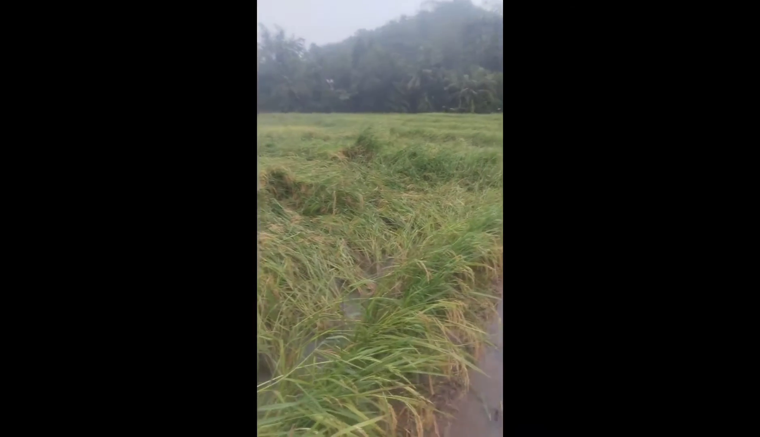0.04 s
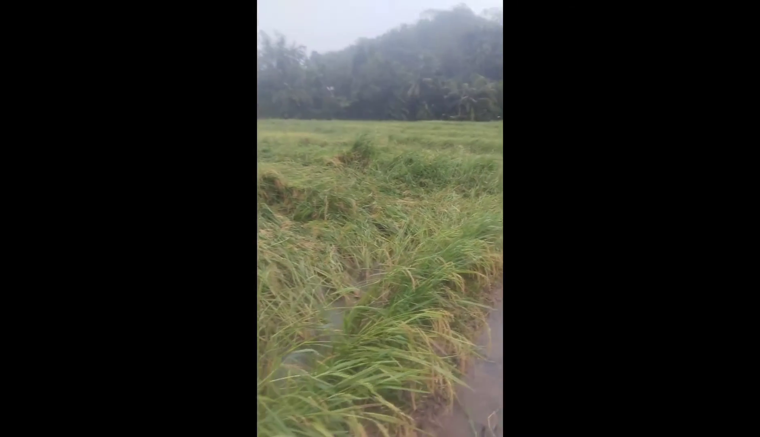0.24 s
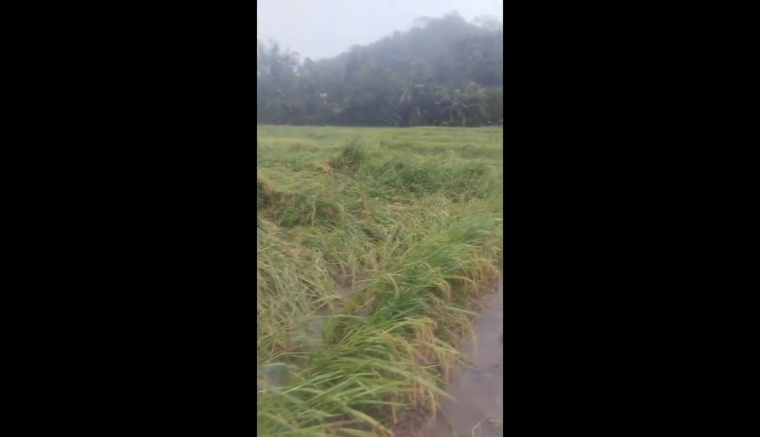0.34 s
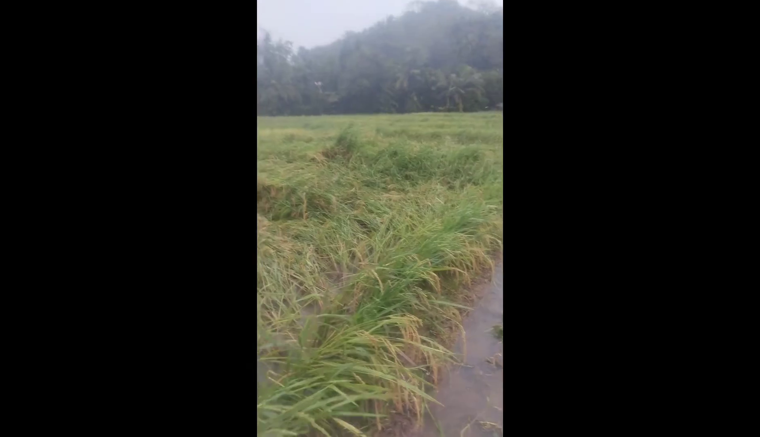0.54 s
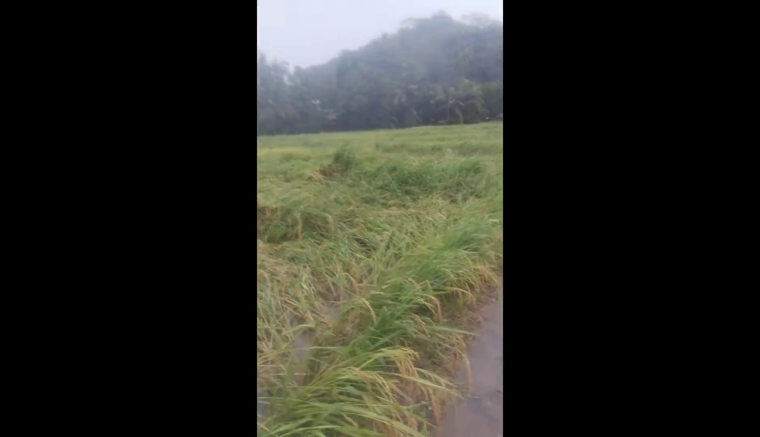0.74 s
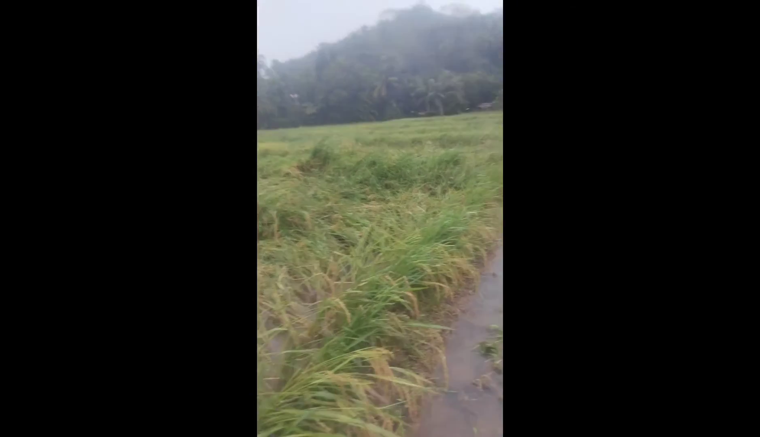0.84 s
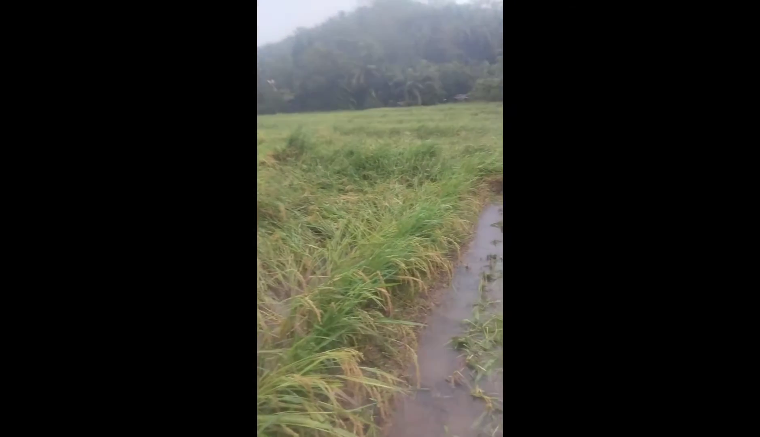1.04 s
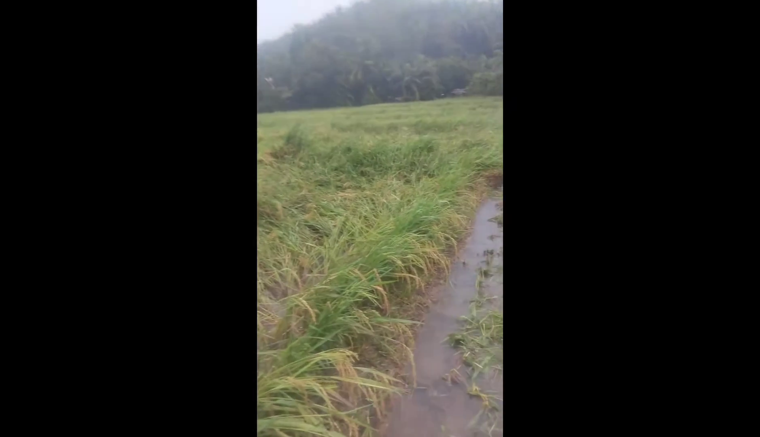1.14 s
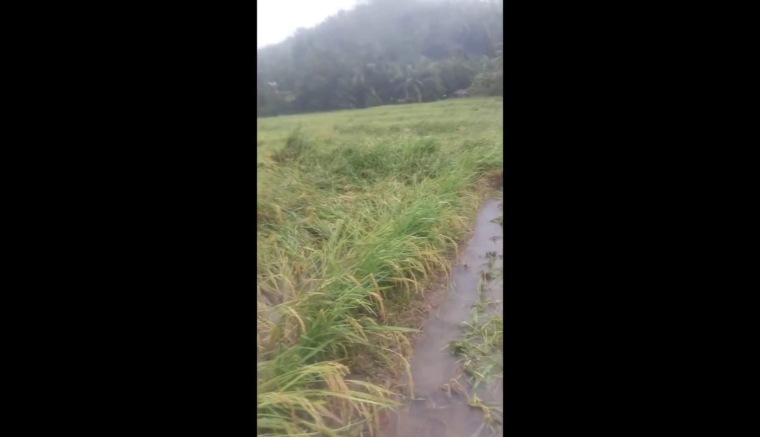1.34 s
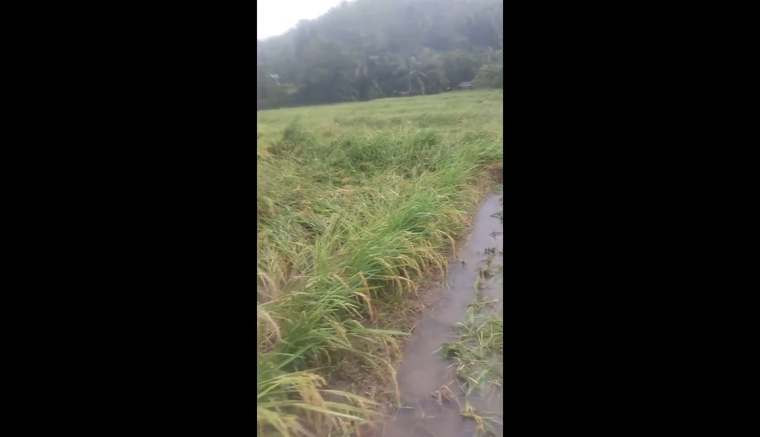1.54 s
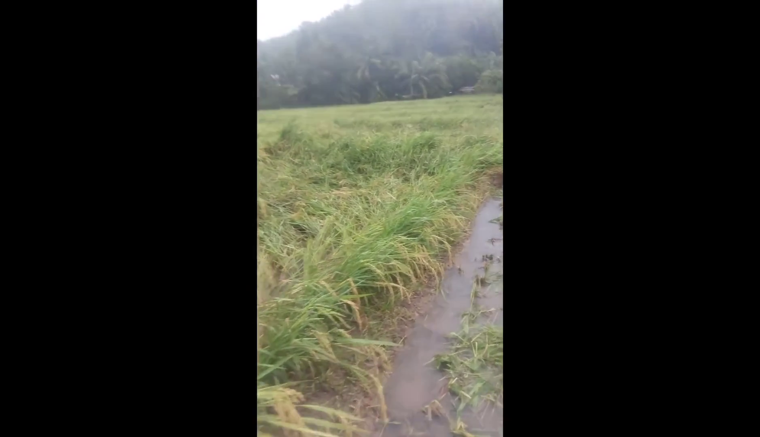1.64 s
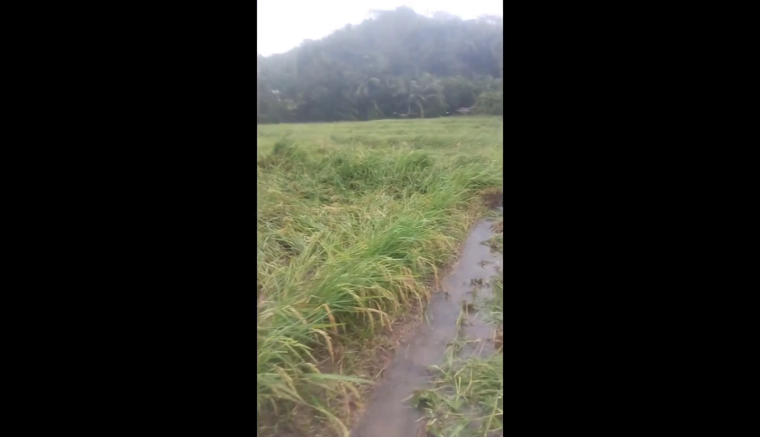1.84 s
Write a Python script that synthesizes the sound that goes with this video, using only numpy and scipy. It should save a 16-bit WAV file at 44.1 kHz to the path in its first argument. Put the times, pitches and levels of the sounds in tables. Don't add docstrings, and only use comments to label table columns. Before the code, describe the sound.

Wading footsteps in a flooded rice field. A dull heel thud at 0.2 seconds leads to a loud, sharp mud splat at 0.35, then bubbling slosh and spray fading with droplet ticks until 0.9. A softer thud and plop come at 1.2, small squelches at 1.5. A far bird whistles at 0.9, 1.45 and 1.8 over faint insects, light wind and a soft croak near 1.55.

```python
import sys
import numpy as np
from scipy import signal
from scipy.fft import rfft, irfft
from scipy.io import wavfile
from scipy.ndimage import uniform_filter1d, map_coordinates

SR = 44100
rng = np.random.default_rng(int(sys.argv[2]) if len(sys.argv) > 2 else 0)


def put_to_file(sound):
    columns = np.atleast_2d(sound).T
    safe = np.clip(columns, -1, 1)
    whole_steps = np.round(safe * 32767)
    wavfile.write(sys.argv[1], SR, whole_steps.astype(np.int16))


def to_linear_factor(level_db):
    exponent = np.asarray(level_db, float) / 20
    return 10 ** exponent


N = 83790


def unit(x):
    return x / np.sqrt(np.mean(x ** 2) + 1e-20)


def along(points, hz):
    f, db = np.transpose(points)
    return to_linear_factor(np.interp(np.log(hz + 1), np.log(f + 1), db))


def level(rows):
    return np.interp(np.arange(N) / SR, *np.transpose(rows))


def wobble(rate_hz):
    knots = rng.standard_normal(int(N * rate_hz / SR) + 4)
    return map_coordinates(knots, [np.arange(N) * rate_hz / SR])


def noise(gain, patchy_db):
    z = signal.stft(rng.standard_normal(N + 512), nperseg=512)[2]
    patches = uniform_filter1d(rng.standard_normal(z.shape), size=5, axis=0)
    patches = uniform_filter1d(patches, size=10, axis=1)
    x = signal.istft(z * to_linear_factor(patchy_db * unit(patches)), nperseg=512)[1][:N]
    return unit(irfft(rfft(x) * gain(np.fft.rfftfreq(N, 1 / SR)), N))


def band(hz, wide_hz):
    return lambda f: 1 / (1 + ((f - hz) / wide_hz) ** 2) ** 1.4


def add(out, s, x):
    i = round(s * SR)
    out[i:i + len(x)] += x[:len(out) - i]


def highpass(x, hz):
    return signal.sosfilt(signal.butter(3, hz, "high", fs=SR, output="sos"), x)


def insects():
    level_db = -62 + .8 * wobble(3) + 1.5 * wobble(90)
    return to_linear_factor(level_db) * noise(band(hz=7985, wide_hz=800), patchy_db=.5)


# f/Hz, level/dB
AIR_COLOUR = [(250, -12), (1460, -15), (3700, -25), (5300, -32.5), (5900, -10), (10700, -38),
              (13300, -10.5), (16000, -28.5)]


def air():
    return to_linear_factor(-68 + 0.49 * wobble(11.0)) * noise(lambda f: along(AIR_COLOUR, f), patchy_db=3.5)


# t/s, level/dB
WIND_LEVEL = [(0, -60), (.12, -72.5), (.2, -60.5), (.3, -51), (.4, -63), (.55, -69.5), (.62, -64.5),
              (.68, -59), (.86, -58.5), (.96, -66.5), (1.04, -68), (1.14, -54), (1.2, -61.5), (1.27, -57.5),
              (1.4, -68.5), (1.5, -67.5), (1.65, -72), (1.9, -72)]
# f/Hz, level/dB
WIND_COLOUR = [(25, -26), (110, 2), (185, -12.5), (440, -23.5), (700, -60)]


def wind():
    rumble = noise(lambda f: along(WIND_COLOUR, f), patchy_db=0)
    power = uniform_filter1d(rumble ** 2, size=SR // 20)
    rumble = rumble / np.sqrt(np.abs(power) + .1)
    return to_linear_factor(level(WIND_LEVEL) + 2.5 * wobble(30)) * rumble


# t/s, level/dB
FROG_LEVEL = [(0, -106), (.2, -70.5), (.5, -70), (.75, -67), (.95, -70.5), (1.05, -71.5), (1.4, -79),
              (1.56, -50), (1.66, -68), (1.76, -67), (1.8, -88.5), (1.9, -67.5)]


def frog():
    return to_linear_factor(level(FROG_LEVEL) + 4 * wobble(35)) * noise(band(hz=1400, wide_hz=80), patchy_db=0)


# t/s, length/s, rms level/dB, f/Hz
CRICKET_CHIRPS = [(.008, 0.013, -65.5, 5910), (0.071, .02, -61.5, 5160), (0.032, 0.49, -76.5, 5150),
                  (0.587, 0.34, -75.5, 4580), (.93, .02, -78, 5050), (.955, 0.044, -87, 5200),
                  (1.034, 0.11, -72.5, 4590), (1.063, 0.023, -72.5, 5220), (1.337, 0.088, -73, 5150),
                  (1.43, 0.027, -76, 4120), (1.5, 0.087, -71, 4120), (1.538, .035, -68.5, 4780),
                  (1.594, 0.16, -75.5, 5160), (1.84, 0.048, -65, 5080)]


def crickets():
    out, wide_hz, pulse_db = np.zeros(N), 80, 4
    for s, life_s, db, hz in CRICKET_CHIRPS:
        n = int(life_s * SR)
        tone = noise(lambda f: 1 / (1 + ((f - hz) / wide_hz) ** 4), patchy_db=0)
        chirp = to_linear_factor(pulse_db * wobble(45)) * tone
        add(out, s, to_linear_factor(db) * np.sqrt(np.hanning(n)) * unit(chirp[:n]))
    return out


# t/s, peak level/dB, ring f/Hz, t60/s, crack level/dB
MUD_SNAPS = [(.189, -47.5, 6320, 0.014, -2), (.3164, -19, 1030, 0.0048, -8.5),
             (.3462, -11, 2212, 0.0075, -15), (.3469, -10, 3158, 0.0028, -10),
             (.3482, -5.5, 1218, 0.0046, -14), (.455, -26.5, 1510, 0.0026, 2),
             (.694, -45, 1400, 0.00086, 4), (.7295, -47, 880, 0.0073, -10), (1.196, -49, 5650, 0.016, 10.5),
             (1.2075, -28.5, 1128, 0.018, -1.5), (1.504, -33.5, 990, 0.011, -5.5),
             (1.531, -35.5, 1280, 0.011, -23), (.938, -46.5, 1800, 0.0013, -24),
             (1.296, -44, 800, 0.017, -21), (1.189, -47.5, 660, 0.027, -35), (.3166, -38, 1930, .008, -30),
             (.3163, -34, 3994, .002, 0), (.3466, -17.5, 5940, 0.0044, -29), (.35, -25, 1187, 0.013, -29),
             (.415, -47, 1020, 0.0055, -20), (.485, -37.5, 1600, .005, -20),
             (1.253, -64, 644, 0.012, -28.5), (1.371, -55, 2280, 0.0075, -19)]
# f/Hz, level/dB
CRACK_COLOUR = [(2000, -36), (3200, -28), (3900, -2), (6000, 12), (9500, -11.5), (13500, -4), (16000, -18)]


def snaps():
    n = 1500
    out, t = np.zeros(N), np.arange(n) / SR
    bright = noise(lambda f: along(CRACK_COLOUR, f), patchy_db=0.5)
    for k, (s, db, hz, t60, crack_db) in enumerate(MUD_SNAPS):
        onset = 1 - np.exp(-t * hz * 9)
        ring = -np.sin(2 * np.pi * hz * t) * to_linear_factor(-60 * t / t60) * onset
        crack_t60 = 0.099 * t60 + 0.0016
        crack = to_linear_factor(crack_db - 60 * t / crack_t60) * bright[k * n:][:n]
        add(out, s, to_linear_factor(db) * (2 * ring + crack))
    return highpass(out, 302)


# t/s, peak level/dB, f/Hz, t60/s
THUD_MODES = [(0.192, -27, 403, 0.041), (0.197, -18.5, 105.6, 0.085), (0.196, -29.5, 179.5, 0.12),
              (0.204, -25, 241, 0.068), (0.241, -44.5, 258.6, 0.35), (1.205, -42.5, 248.3, 0.15),
              (1.205, -28, 450, 0.07), (.347, -44.5, 460, .04), (0.63, -44, 99, 0.092),
              (1.03, -50.5, 262, 0.08), (.222, -48, 420, 0.14), (0.22, -49.5, 350, .15),
              (1.07, -45.5, 155, .12)]


def thud():
    out, t, rise_s = np.zeros(N), np.arange(SR // 4) / SR, 0.0048
    for s, db, hz, t60 in THUD_MODES:
        env = to_linear_factor(db - 60 * t / t60) * (1 - np.exp(-t / rise_s))
        add(out, s, env * -np.sin(2 * np.pi * hz * t))
    return out


# t/s, level/dB
FOOT_SPRAY_LEVEL = [(0, -126), (.19, -66.5), (.37, -71), (.46, -56), (.6, -61), (.76, -59), (.9, -69),
                    (1.17, -67), (1.2, -57.5), (1.3, -65.5), (1.49, -64.5), (1.54, -56), (1.66, -71.5),
                    (1.9, -65.5)]
# f/Hz, level/dB
FINE_COLOUR = [(300, -35), (900, -7), (3000, -22), (5300, -23.5), (5900, 0), (10000, -6), (15300, -6.5),
               (16000, -28.5)]
# f/Hz, level/dB
COARSE_COLOUR = [(2200, -33), (3500, -6.5), (5000, 4), (6500, -18)]


def spray():
    fine = noise(lambda f: along(FINE_COLOUR, f), patchy_db=1.5)
    coarse = noise(lambda f: along(COARSE_COLOUR, f), patchy_db=2.5)
    fine_db = level(FOOT_SPRAY_LEVEL)
    coarse_db = -62 + 2.2 * (fine_db + 56.5) + 3.5 * wobble(120)
    return to_linear_factor(fine_db + 2.4 * wobble(150)) * fine + to_linear_factor(coarse_db) * coarse


# peak t/s, rise/s, t60/s, rms level/dB, centre f/Hz, log pitch spread
SLOSH_SWARMS = [(.32, 0.015, 0.9, -50.5, 894, 0.37), (.4, 0.086, 0.31, -53.5, 940, 0.46),
                (.46, 0.044, 0.44, -42.5, 2185, 0.47), (.53, 0.018, 0.21, -50, 2410, 0.065),
                (.595, 0.0091, 0.22, -49.5, 2220, 0.091), (1.221, 0.017, 0.29, -59.5, 2330, 0.044),
                (1.22, 0.026, 0.45, -43.5, 749, 0.33), (1.323, 0.0081, 0.4, -52.5, 1940, 0.082),
                (1.516, 0.013, 0.34, -48, 1256, 0.21), (1.523, 0.011, 0.38, -52, 2520, 0.037),
                (1.53, 0.006, 0.36, -53.5, 1890, 0.026)]


def sloshes():
    out, count, grain_n = np.zeros(N), 2000, 500
    t = np.arange(grain_n) / SR
    span_n, lead_s, cycles, size_db = int(.5 * SR), .12, 7, 3.3
    for s, rise_s, t60, db, centre_hz, spread in SLOSH_SWARMS:
        r, e = rng.standard_normal((count, 2)), rng.random((count, 2))
        hz = np.clip(centre_hz * np.exp(spread * np.clip(r[:, :1], -2, 2)), 200, 7000)
        u = t * hz / (cycles * np.exp(.3 * r[:, 1:]))
        size = to_linear_factor(-size_db * np.log(e[:, 1:] + 0.021)) * np.sqrt(hz)
        grain = size * u * np.exp(-4 * u) * np.sin(2 * np.pi * hz * t * (1 + .03 * u))
        at = (e[:, :1] * span_n).astype(int) + np.arange(grain_n)
        swarm = unit(np.bincount(at.ravel(), grain.ravel(), span_n + grain_n))
        from_peak_s = np.arange(len(swarm)) / SR - lead_s
        env = np.where(from_peak_s < 0, np.exp(-(from_peak_s / rise_s) ** 2), to_linear_factor(-60 * from_peak_s / t60))
        add(out, s - lead_s, to_linear_factor(db) * env * swarm)
    return out


# t/s, peak level/dB, f/Hz, length/s
BUBBLE_PLOPS = [(0.291, -47.5, 1400, 0.032), (0.502, -43, 1010, 0.0075), (.589, -42, 1870, 0.0076),
                (0.594, -51, 1400, 0.02), (.693, -48.5, 1448, 0.014), (.755, -52, 1456, 0.011),
                (.756, -54.5, 800, 0.0094), (0.851, -58, 2390, 0.014), (.921, -48, 515, 0.0082),
                (0.931, -55, 1822, .012), (1.099, -57.5, 1495, 0.017), (1.112, -57.5, 1264, 0.029),
                (1.131, -57.5, 1480, 0.015), (1.184, -47, 1472, 0.026), (1.2095, -18, 710, 0.0058),
                (1.206, -38.5, 2360, 0.0056), (1.2175, -31.5, 740, 0.0035), (1.321, -33.5, 2237, 0.0035),
                (1.3214, -34, 1760, 0.004), (1.404, -49.5, 1800, 0.0062), (1.451, -44.5, 1312, 0.018),
                (1.54, -35.5, 1280, 0.0039), (1.542, -41, 2560, 0.0041), (1.559, -40, 1466, 0.0058),
                (1.578, -35.5, 1400, 0.0047), (1.69, -52, 1400, 0.014), (1.806, -51, 2705, 0.0074),
                (1.849, -54.5, 1272, 0.023), (.51, -51, 3580, .005), (.525, -44.5, 2490, .006),
                (.538, -52, 3610, .006), (.534, -53, 850, .01), (.551, -44.5, 2560, 0.0064),
                (.593, -47, 2815, 0.0063), (.605, -47, 2080, .006), (.62, -53, 1920, .008),
                (.9, -67.5, 3430, 0.011), (1.07, -55.5, 3390, 0.0098), (1.433, -52.5, 3300, 0.0094),
                (1.553, -41.5, 1975, .006), (1.578, -45.5, 2010, .006), (1.586, -50, 2550, 0.0061),
                (1.632, -50, 1400, 0.0083), (1.655, -64, 3350, 0.0082)]


def plops():
    out, rise, peak = np.zeros(N), .02, .5
    for s, db, hz, life_s in BUBBLE_PLOPS:
        u = np.arange(int(3.2 * life_s * SR)) / SR / life_s / peak
        phase = 2 * np.pi * np.cumsum(hz * (1 + rise * (u * peak - .5))) / SR
        add(out, s, to_linear_factor(db) * u * np.exp(.5 - .5 * u * u) * np.sin(phase))
    return out


# t/s, peak level/dB
LEAF_TICKS = [(0.4254, -49), (0.5811, -41.5), (0.6392, -39.5), (0.695, -46), (0.7282, -35.5),
              (0.7625, -29.5), (0.8373, -40), (0.9162, -46), (0.9377, -47), (1.0854, -43), (1.0928, -40),
              (1.1352, -40), (1.1894, -32.5), (1.2991, -42.5), (1.3354, -39)]
# f/Hz, level/dB
TICK_COLOUR = [(3000, -37.5), (4300, -4.5), (7000, 7.5), (13000, -0.5), (16000, -12.5)]


def ticks():
    n, t60, rms_under_peak_db = 800, .006, -7
    out, t = np.zeros(N), np.arange(n) / SR
    bright = noise(lambda f: along(TICK_COLOUR, f), patchy_db=0)
    for k, (s, db) in enumerate(LEAF_TICKS):
        add(out, s, to_linear_factor(db + rms_under_peak_db - 60 * t / t60) * bright[k * n:][:n])
    return out


# t/s, length/s, rms level/dB, top f/Hz, share of length before the turn, blur 0-1
BIRD_WHISTLES = [
    (.92, 0.1, -44.5, 3321, 0.74, 0.15),
    (1.431, 0.038, -51, 3333, 0.23, 0.77),
    (1.5, 0.15, -51.5, 3430, 0.22, 0.25),
    (1.82, 0.11, -53, 3427, 1, 0.46),
]


def bird():
    out, t = np.zeros(N), np.arange(SR // 3) / SR
    climb_hz, drop_hz, echo_db, echo_t60 = 198, 200, -13.5, 0.33
    for s, life_s, db, top_hz, turn, blur in BIRD_WHISTLES:
        u = np.arange(int(life_s * SR)) / SR / life_s
        below_hz = np.interp(u, [0, np.clip(turn, .02, .98), 1], [climb_hz * turn, 0, drop_hz])
        pitch_hz = top_hz - below_hz + blur * 60 * wobble(200)[:len(u)]
        env = np.interp(u, [0, .08, .35, .86, 1], [0, 1 - 0.46 * turn, .7, 0.44 + 1.0 * turn, 0])
        env = env * (1 + blur * wobble(121)[:len(u)])
        add(out, s, to_linear_factor(db - 3.5) * env * np.sin(2 * np.pi * np.cumsum(pitch_hz) / SR))
    tail = rng.standard_normal(len(t)) * to_linear_factor(-60 * t / echo_t60) * (t > .03)
    echo = signal.fftconvolve(out, tail / np.linalg.norm(tail))[:N]
    return out + to_linear_factor(echo_db) * echo


def scene():
    ambience = insects() + air() + wind() + frog() + crickets()
    step = snaps() + thud() + spray() + sloshes() + plops()
    return (ambience + step + ticks() + bird())[None]


def band_limit(x):
    return signal.sosfilt(signal.butter(12, 16460, fs=SR, output="sos"), x)


def record(dry):
    duck_db, recovery_s, top_hz, low_hz = 10, .03, 15700, 62
    over = np.maximum(np.abs(dry[0]) - .3, 0)
    memory = signal.fftconvolve(over, np.exp(-np.arange(SR // 4) / SR / recovery_s))[:N]
    duck = to_linear_factor(-duck_db * np.roll(memory / (memory.max() + 1e-9), 150))
    lowpass = signal.cheby2(12, 50, top_hz + 300, fs=SR, output="sos")
    mix = highpass(signal.sosfilt(lowpass, dry * duck), low_hz)
    return band_limit(mix)


dry = scene()
out = record(dry)
put_to_file(out)
```